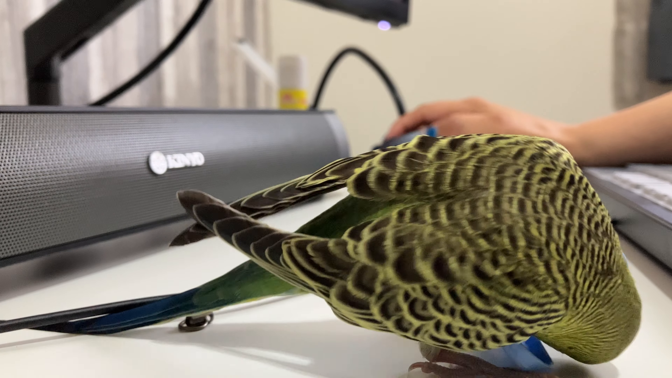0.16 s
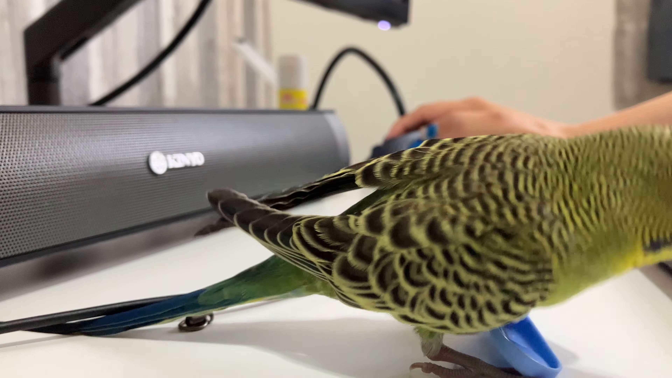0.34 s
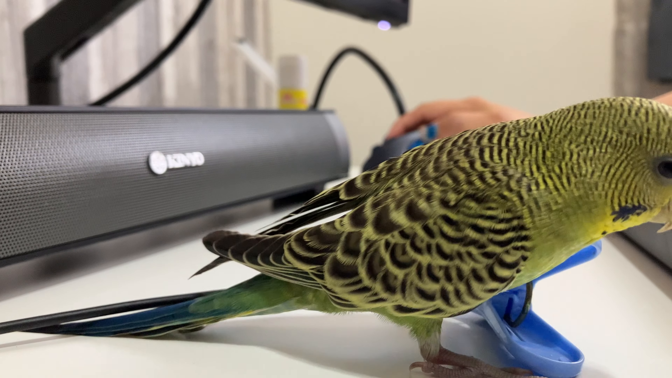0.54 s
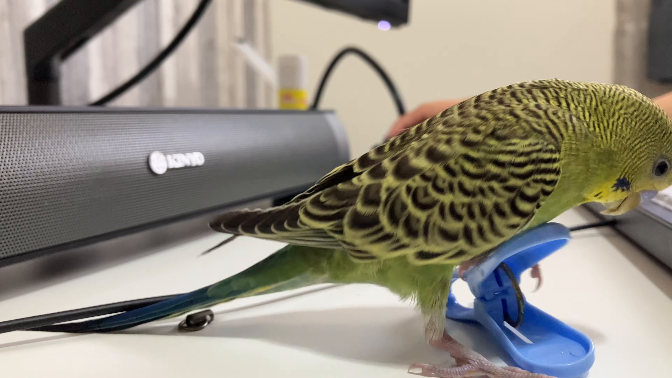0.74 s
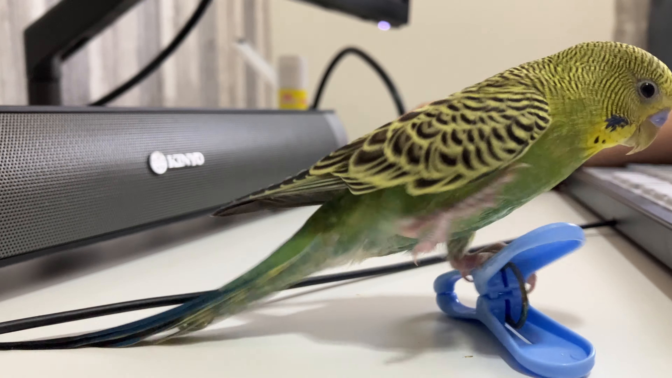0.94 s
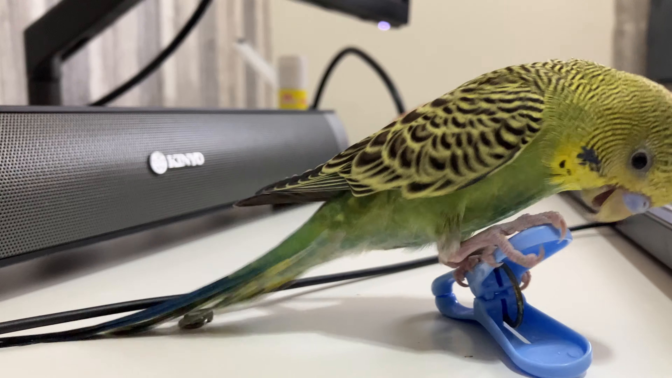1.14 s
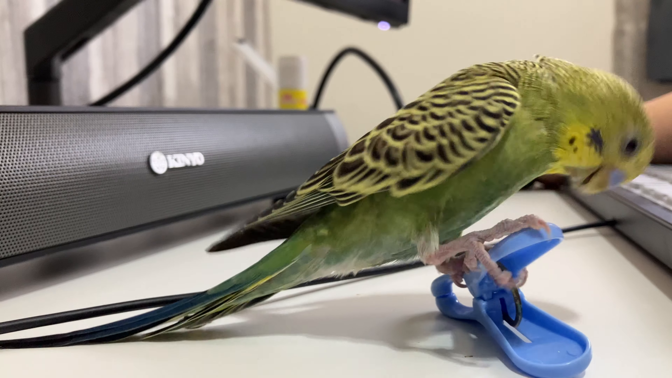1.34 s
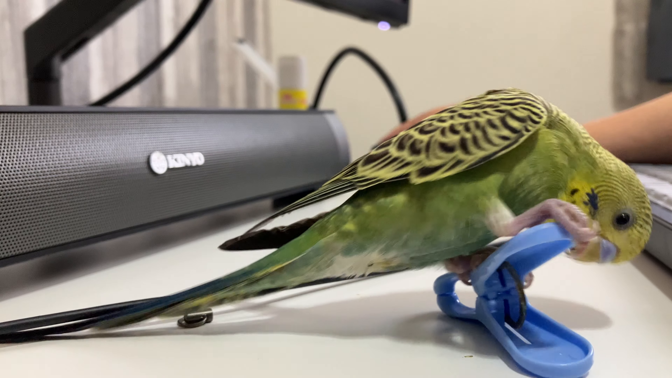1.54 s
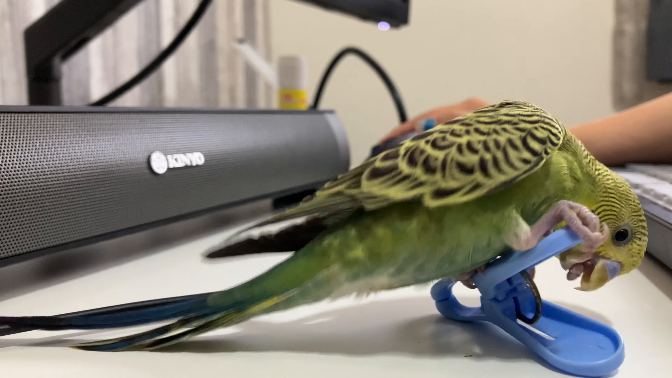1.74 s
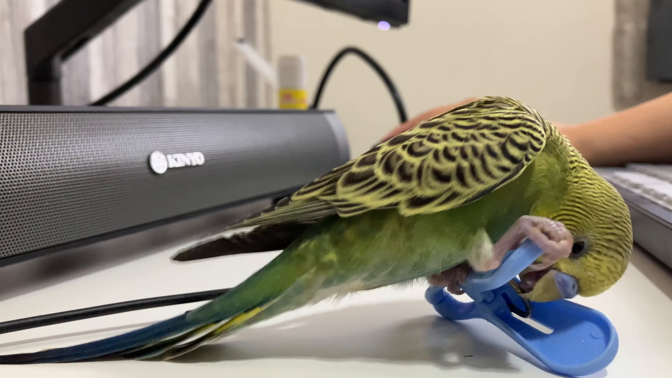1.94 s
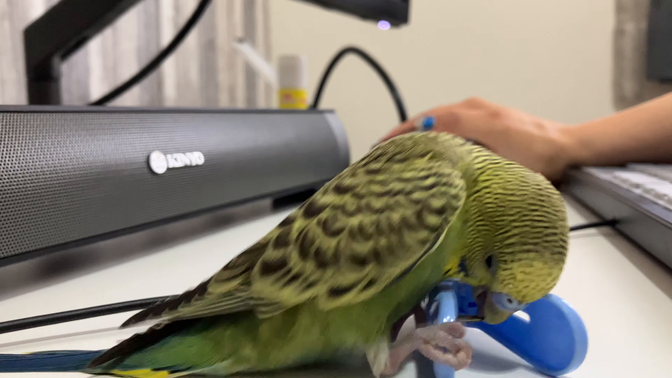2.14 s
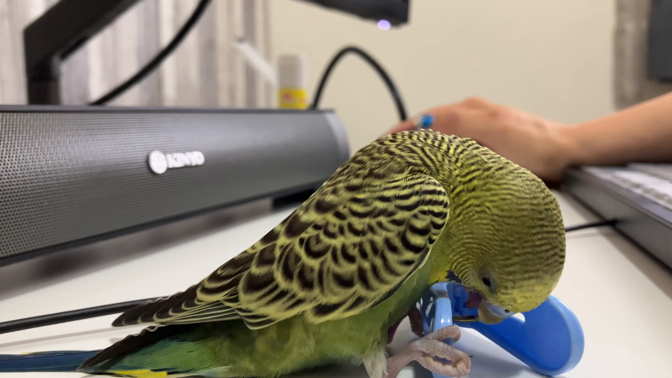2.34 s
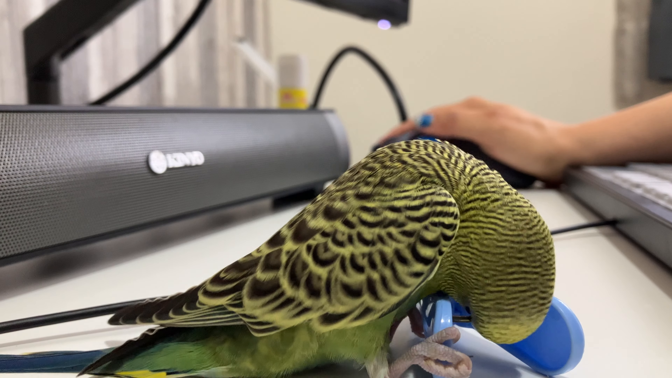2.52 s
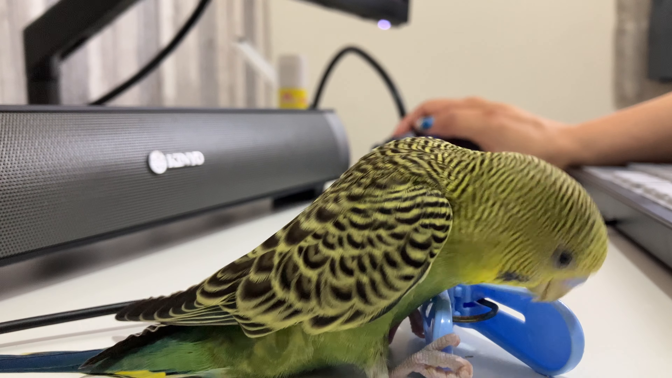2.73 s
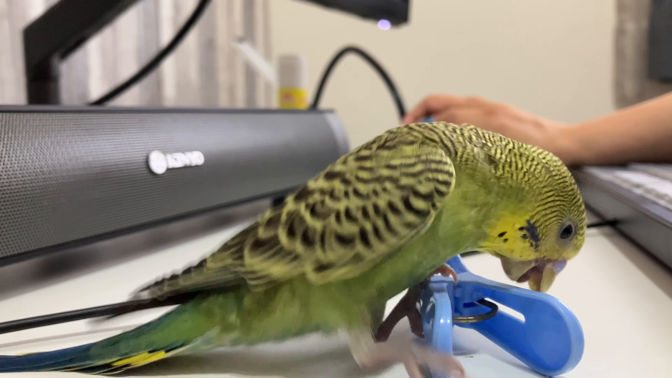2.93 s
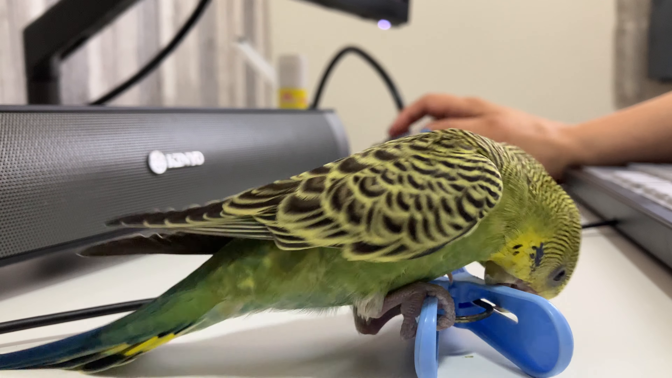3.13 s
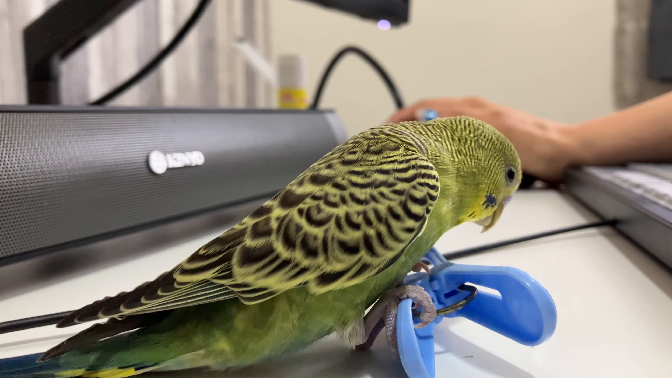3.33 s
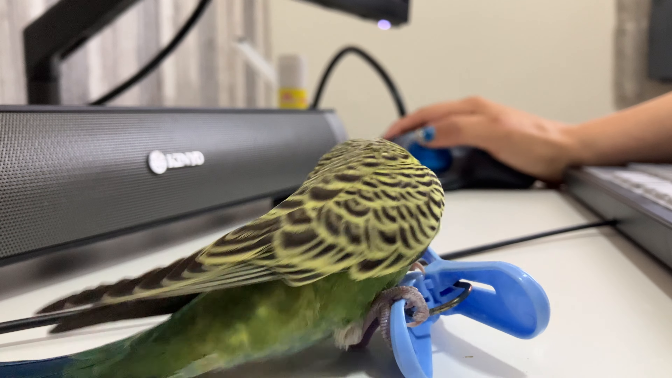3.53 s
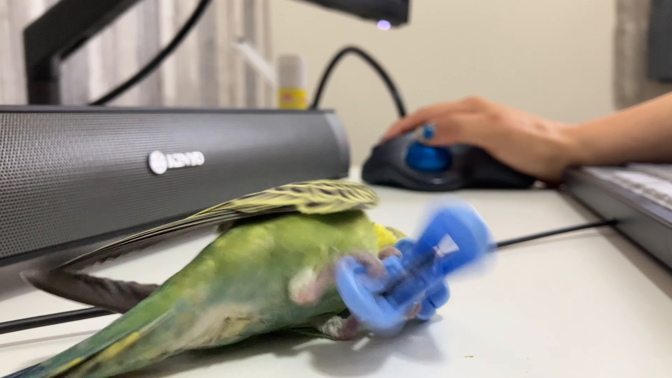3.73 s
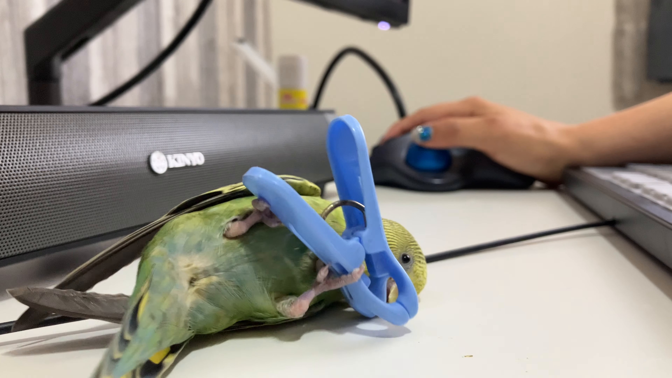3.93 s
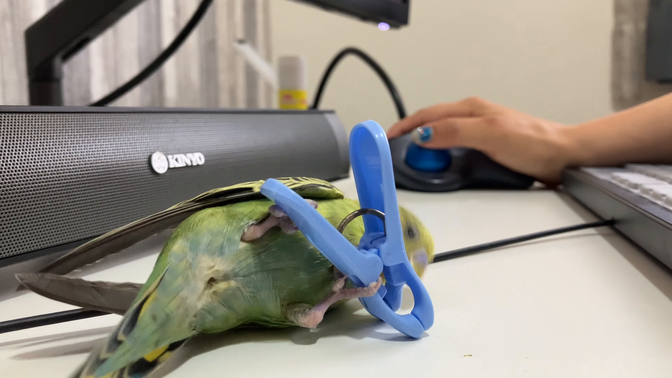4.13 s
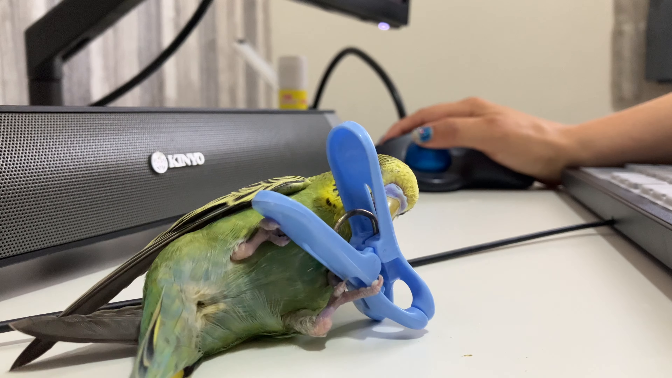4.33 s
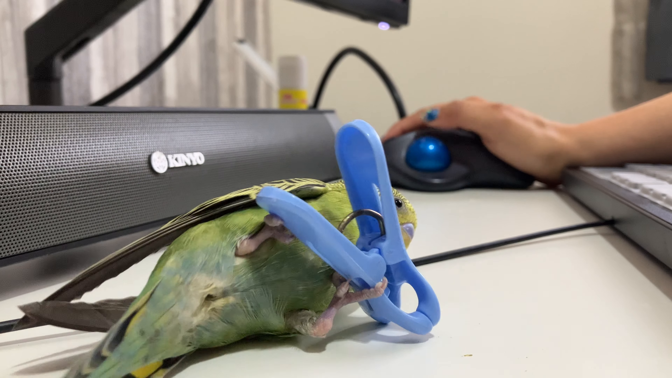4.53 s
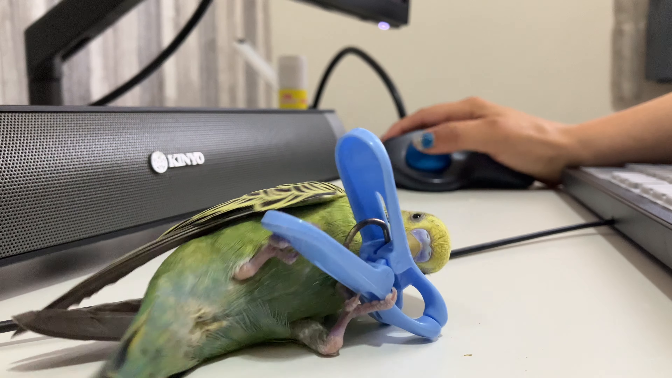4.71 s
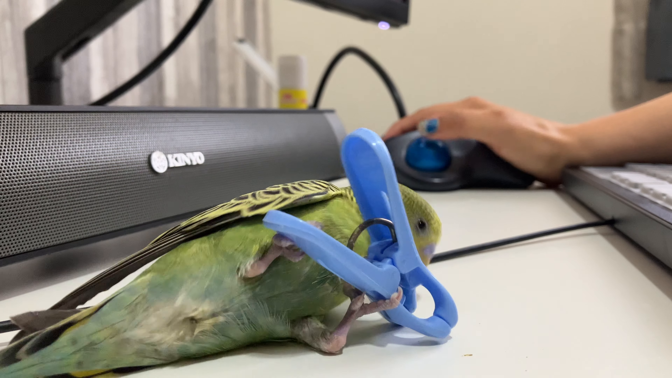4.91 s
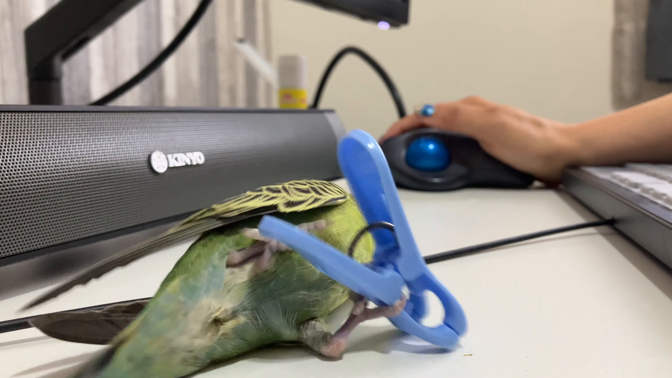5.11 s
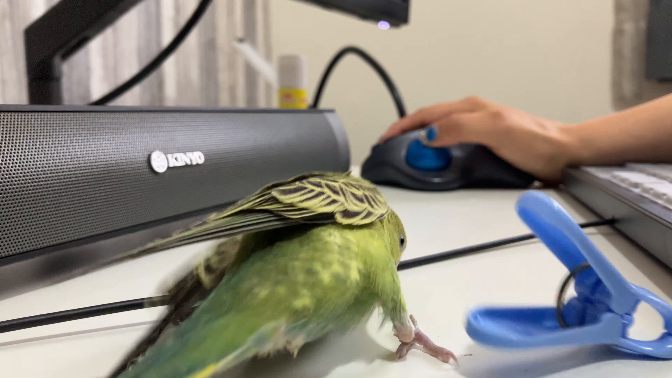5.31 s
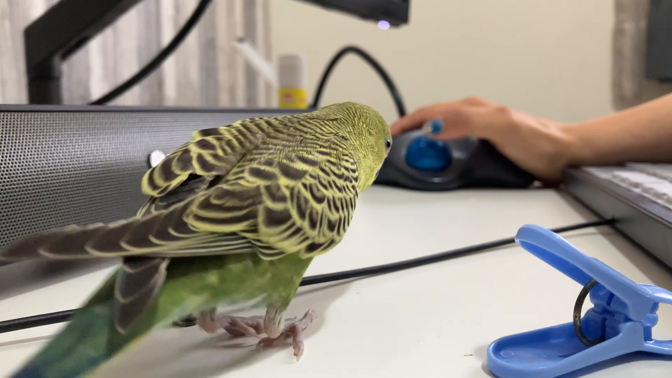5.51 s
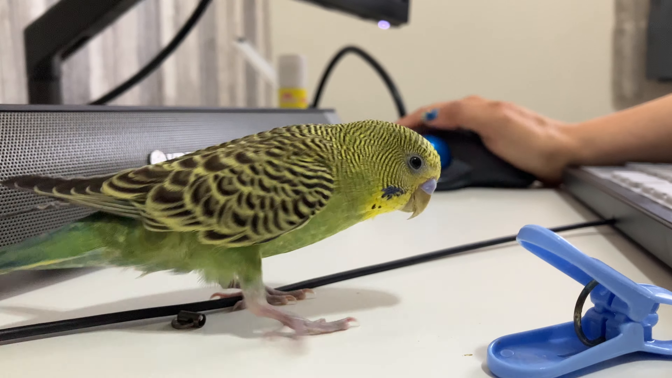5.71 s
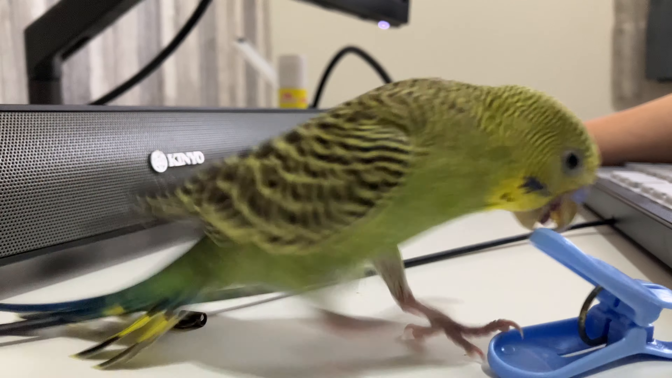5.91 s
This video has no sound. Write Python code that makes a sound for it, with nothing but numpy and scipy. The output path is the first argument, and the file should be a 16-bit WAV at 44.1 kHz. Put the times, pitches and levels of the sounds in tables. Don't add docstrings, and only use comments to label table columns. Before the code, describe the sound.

A parakeet handles a plastic clothespin on a hard desk top, captured close in stereo. Soft dull taps, claw rasps and feather flutters leave gaps of low room air. A single sharp knock stands out early, irregular thumps follow in the middle, then a dense rattling burst near the end as the peg tumbles away. Crisp ticks and light scraping finish it, with a short dry indoor tail.

```python
import sys
import numpy as np
from scipy import signal
from scipy.fft import rfft, irfft, next_fast_len
from scipy.io import wavfile

SR = 44100
rng = np.random.default_rng(int(sys.argv[2]) if len(sys.argv) > 2 else 0)


def generate_wav(sig):
    pcm = np.round(np.clip(np.atleast_2d(sig).T, -1, 1) * 32767).astype(np.int16)
    wavfile.write(sys.argv[1], SR, pcm)


def linear_from_db(decibels):
    return 10 ** (np.asarray(decibels, float) / 20)


N = 267246

# (time [s], peak level [dB], centre pitch [Hz], hardness [dB])
KNOCK_EVENTS = [(0.12, -32.5, 444, -22), (0.2477, -40, 586, -4), (0.351, -35, 660, -16),
                (0.38, -33.5, 403, -19), (0.469, -36, 687, -15), (0.6498, -38.5, 656, -23),
                (0.6844, -39.5, 380, -21), (0.784, -33, 637, -7), (0.8609, -35, 650, -30),
                (0.8906, -29.5, 706, -5), (1.1619, -32.5, 675, -11), (1.336, -40, 645, -13),
                (1.4558, -30.5, 410, -35), (1.4897, -26, 413, -27), (1.5545, -30, 740, -13.5),
                (1.6634, -29, 410, -9), (1.7238, -36.5, 490, -3.5), (1.882, -28, 540, -8.5),
                (1.927, -43, 405, -26), (1.945, -42.5, 487, -9), (2.1605, -24, 776, -4.5),
                (2.18, -13, 663, -12), (2.2044, -39, 610, -14), (2.2225, -49, 575, -27),
                (2.3135, -29.5, 673, -14), (2.4037, -38.5, 734, 0), (2.471, -44.5, 650, -2),
                (2.492, -33.5, 677, -4), (2.5381, -31.5, 670, 0), (2.7434, -40, 680, -7.5),
                (2.886, -37, 632, 4.5), (2.945, -30, 874, 6), (2.9743, -26.5, 494, -2.5),
                (3.1245, -33.5, 870, -7), (3.1452, -33.5, 794, -7), (3.205, -41.5, 720, -4),
                (3.243, -42.5, 670, -23), (3.402, -18, 616, -12.5), (3.4436, -24, 635, -17),
                (3.5228, -41.5, 570, -7), (3.554, -38, 460, -18.5), (3.576, -36.5, 654, -7),
                (3.6615, -40, 564, -13), (3.7062, -18, 434, -14), (3.7314, -34, 360, -31),
                (3.7727, -26, 700, -18), (3.7926, -31, 615, -19.5), (3.8194, -19, 422, -29),
                (3.8597, -32.5, 392, -28), (3.883, -43, 387, -22), (3.9541, -38, 393, -17.5),
                (4.0245, -20.5, 683, -6.5), (4.112, -30.5, 655, -16), (4.1346, -41, 720, -20),
                (4.2201, -30.5, 640, -13), (4.253, -30.5, 536, -12.5), (4.2856, -35, 545, -35),
                (4.476, -36.5, 590, -13), (4.6248, -19.5, 670, -9), (4.6796, -33, 760, -25),
                (4.7003, -16, 683, -10.5), (4.783, -24, 726, -9.5), (4.8689, -23.5, 606, -7.5),
                (5.0374, -36.5, 675, -23), (5.0957, -18, 460, -15), (5.1282, -26.5, 514, -26),
                (5.1565, -18.5, 694, -8), (5.1688, -20, 600, -7), (5.2001, -20.5, 643, 1),
                (5.213, -18, 630, -6), (5.2213, -21.5, 624, -0.5), (5.2303, -27.5, 650, -1),
                (5.2455, -21, 644, -2), (5.2776, -15, 594, 3), (5.2901, -9.5, 664, 0.5),
                (5.3124, -16, 677, -1), (5.3259, -23, 560, 0), (5.3452, -30, 630, -4),
                (5.3558, -16.5, 674, 1), (5.3717, -18.5, 565, 2), (5.414, -39, 460, -18.5),
                (5.4294, -20, 560, -6.5), (5.4398, -21, 466, -15), (5.4591, -21, 535, -10),
                (5.4738, -22.5, 670, -5), (5.627, -29.5, 570, 2), (5.7734, -36, 690, -8),
                (5.8242, -38.5, 630, -16), (5.9065, -24.5, 530, -17), (5.9582, -24, 726, -14),
                (5.972, -24, 620, -5.5), (6.054, -27, 610, -3)]


def rms_one(x):
    return x / np.sqrt(np.mean(x ** 2) + 1e-20)


def in_time(rows):
    times, *columns = np.transpose(rows)
    return [np.interp(np.arange(N) / SR, times, column) for column in columns]


def drift(rate_hz):
    pole = np.exp(-80 * np.pi * rate_hz / SR)
    white = rng.standard_normal(N // 40 + 2002)
    slow = signal.lfilter([1], [1, -2 * pole, pole * pole], white)[2000:]
    return np.interp(np.arange(N) / 40, np.arange(len(slow)), rms_one(slow))


def band(x, low_hz, high_hz, order=2):
    edges_hz = [low_hz, min(high_hz, SR / 2.2)]
    return signal.sosfilt(signal.butter(order, edges_hz, "band", fs=SR, output="sos"), x)


def ring(push, hz, t60_s):
    radius = linear_from_db(-60 / (t60_s * SR))
    angle = 2 * np.pi * hz / SR
    return signal.lfilter([0, np.sin(angle)], [1, -2 * radius * np.cos(angle), radius * radius], push + 1e-18)


def coloured(points, alike):
    top_hz = 15900
    mid, side = rng.standard_normal((2, N))
    alike = np.clip(alike, 0, 1)
    pair = np.sqrt(1 + alike) * mid + np.sqrt(1 - alike) * side * [[1], [-1]]
    hz, level_db = np.transpose(points)
    bin_hz = np.arange(N // 2 + 1) * SR / N
    shape = linear_from_db(np.interp(np.log(bin_hz + 1), np.log(hz), level_db))
    shape[int(top_hz * N / SR):] = 0
    return rms_one(irfft(rfft(pair) * shape, N))


def late(x, lag_s):
    return np.interp(np.arange(N) - lag_s * SR, np.arange(N), x)


def train(times, heights):
    out = np.zeros((2, N))
    out[:, np.minimum((times * SR).astype(int), N - 1)] = heights
    return out


def grains(per_s, spread_db):
    sizes = linear_from_db(spread_db * np.minimum(rng.exponential(1, N), 5)) * rng.choice([-1, 1], N)
    return rms_one(sizes * (rng.random(N) < per_s / SR))


def knocks(drag_db):
    # (frequency [Hz], level [dB])
    desk_modes = [(95, -7.5), (243, -4), (290, -9), (345, -2.5), (395, 0), (453, -4), (525, -3.5),
                  (595, -4.5), (665, -4.5), (730, -0.5), (790, -1), (905, -11), (980, 2.5), (1085, -3.5)]
    # (frequency [Hz], level [dB])
    peg_modes = [(1130, -5), (1220, -7.5), (1380, -3.5), (1555, 3.5), (1610, -2), (1850, -5), (2260, 0),
                 (2900, -6)]
    times, peak_db, pitch_hz, hard_db = np.transpose(KNOCK_EVENTS)
    luck = rng.standard_normal((len(times), 3, len(desk_modes) + len(peg_modes)))
    drag = linear_from_db(drag_db - 36 + 5.34 * drift(32)) * grains(per_s=430, spread_db=1.0)
    desk, dragged, peg = pulses(), 0, 0
    for k, (hz, level_db) in enumerate(desk_modes + peg_modes):
        on_peg = k >= len(desk_modes)
        sign = (-1) ** k
        t60_s = min(65 / hz, .17)
        place_db = 4.73 * luck[:, 0, k] + 2.62 * luck[:, 1:, k].T
        if on_peg:
            blow = train(times, sign * linear_from_db(peak_db + hard_db + level_db + place_db))
            peg = peg + linear_from_db(-10) * ring(blow, hz, t60_s)
            peg = peg + linear_from_db(-3.5) * ring(blow, hz, 10.6 / hz)
        else:
            near_db = -7.0 * np.abs(np.log2(hz / pitch_hz)) ** 2.07
            blow = train(times, sign * linear_from_db(peak_db + level_db + near_db + place_db))
            desk = desk + linear_from_db(-13) * ring(blow, hz, t60_s)
        dragged = dragged + sign * linear_from_db(level_db - 3.3 * on_peg) * ring(drag, hz, 0.8 * t60_s)
    return band(desk, 150, 1700) + band(peg, 1200, 4000) + band(dragged, 65, 3000)


def pulses():
    out = np.zeros(N + 2000)
    t = np.arange(2000) / SR
    for time_s, peak_db, pitch_hz, _ in KNOCK_EVENTS:
        turns = pitch_hz * (0.869 * t + 0.00093 * (1 - np.exp(-t / 0.0022)))
        rise = t * pitch_hz / 1.3
        at = int(time_s * SR) - 40
        out[at:at + len(t)] += linear_from_db(peak_db + 5) * rise * np.exp(-rise) * np.sin(2 * np.pi * turns)
    return out[:N]


def clicks():
    # (time [s], peak level [dB], lower part [dB], length [ms])
    click_events = [(0.058, -54, -37, 1.1), (0.093, -52, -7, 1.4), (0.1377, -39, -12, 1.9),
                    (0.2113, -40, -11, 1.7), (0.2474, -35.5, -14, 1.4), (0.2546, -47, -13, 0.92),
                    (0.2598, -43, -13, 1.8), (0.2744, -52, -11, 2), (0.3797, -38.5, -9, 2.3),
                    (0.461, -41.5, -6, 2.1), (0.6376, -49, -22, 1.5), (0.6707, -36.5, -15, 0.86),
                    (0.688, -40, -20, 2), (0.7747, -38.5, -5.5, 2), (0.789, -28.5, -25, 0.96),
                    (0.8941, -40, -23, 5.4), (1.1584, -27.5, -16.5, 1.54), (1.181, -41, -7.5, 0.99),
                    (1.4501, -38.5, -21, 1.2), (1.4644, -47.5, -13, 1.0), (1.5274, -54.5, -27, 2.4),
                    (1.718, -40.5, -9.5, 2), (1.7431, -35, -9.5, 1.8), (1.8558, -37, -13, 1.0),
                    (1.8795, -33.5, -8, 0.56), (1.9442, -22, -13.5, 1.06), (2.179, -14, 1.5, 1.02),
                    (2.4025, -52, 2.5, 1.5), (2.4712, -41.5, -2.5, 1.6), (2.9439, -23, -4.5, 1.3),
                    (2.9593, -23, -30, 1.05), (2.9643, -25, -13.5, 2.2), (3.0106, -24.5, -22, 0.83),
                    (3.0256, -43, -17, 1.2), (3.1245, -33, -7.5, 0.86), (3.146, -45.5, 0.5, 5.9),
                    (3.206, -38, -3, 1.6), (3.2414, -45, -14, 1.3), (3.4011, -26.5, -5.5, 0.85),
                    (3.4194, -47, -3, 2.0), (3.4463, -38.5, -5, 1.9), (3.5799, -33, -14.5, 1.56),
                    (3.658, -61, -13, 1.4), (3.817, -33.5, -4.5, 1.4), (3.922, -40, -12, 0.48),
                    (3.9262, -37.5, -4.5, 1.4), (3.9402, -45.5, 6, 1), (3.954, -33.5, -12, 2.5),
                    (3.973, -48, -16, 0.79), (3.999, -40.5, -6.5, 1.5), (4.0231, -46.5, 6, 1.2),
                    (4.0379, -45, -3, 1.4), (4.1897, -38.5, -9, 2.5), (4.2498, -34.5, -4, 1.6),
                    (4.2635, -48, -10, 1.4), (4.2833, -41, -8.5, 2.1), (4.627, -41.5, -2, 1.3),
                    (4.7042, -41, 4.5, 0.84), (5.0944, -40.5, -2, 1.7), (5.1573, -20.5, -3.5, 1.1),
                    (5.201, -14.5, -18, 1.2), (5.2781, -22, -3, 2.2), (5.288, -3.5, -12.5, 1.25),
                    (5.3119, -23, 4, 1.7), (5.3565, -35, -1, 4.7), (5.3706, -5, -12, 1.35),
                    (5.4273, -11, -13, 2.2), (5.4555, -18.5, -3, 2), (5.4731, -22, -6, 1.8),
                    (5.569, -36, -13, 4.2), (5.6274, -0.5, -18, 0.72), (5.6436, -22.5, -4, 1.5),
                    (5.6486, -35, -2, 0.76), (5.6684, -1.5, -25.5, 0.62), (5.681, -23.5, -11, 1.1),
                    (5.6897, -13.5, -16.5, 1.24), (5.7118, -18, -20, 1.5), (5.7246, -18.5, -20.5, 1.3),
                    (5.7518, -18.5, -17, 1.2), (5.7657, -17.5, -19, 0.76), (5.7726, -29, -14, 1.2),
                    (5.7755, -32, -21, 2), (5.8232, -43, 11.5, 1.2), (5.8736, -38, -8, 3.5),
                    (5.9057, -24, -20, 1.4), (5.9117, -32, -3, 1.8), (5.937, -26, -12.5, 5.5),
                    (5.9613, -19.5, -9.5, 1.7), (5.971, -15.5, -7.5, 1.1), (5.983, -16, -18, 1.46),
                    (5.998, -25, -13, 1.1)]
    edge_env, crackle_env, lower_env = envelope = np.zeros((3, N))
    offsets = np.arange(-400, 3000)
    t = offsets / SR
    for time_s, peak_db, lower_db, length_ms in click_events:
        width_s = max(length_ms - .6, .15) / 1000
        edge = np.exp(-np.where(t < 0, -t / (.4 * width_s), t / (.7 * width_s)))
        crackle = linear_from_db(-22.5) * np.exp(-t / 0.0086) * (t > 0)
        lower = linear_from_db(lower_db + 3) * np.where(t < 0, edge, np.exp(-t / (width_s + 0.0023)))
        at = int(time_s * SR) + offsets
        inside = at < N
        envelope[:, at[inside]] += linear_from_db(peak_db + 2) * np.array([edge, crackle, lower])[:, inside]
    white = rng.standard_normal((2, N))
    white = np.sign(white) * np.abs(white) ** .5
    return band(white * (edge_env + crackle_env), 5500, 14000) + band(white * lower_env, 1600, 6650)


def rubbing(rasp_db, rustle_db):
    # (frequency [Hz], density [dB per Hz])
    feather_spectrum = [(900, -31), (1800, -13.5), (4000, -9), (7000, -8), (9500, -8), (12000, -11.5),
                        (15500, -13)]
    barbs = 1 + .5 * signal.lfilter([.1], [1, -.96], np.abs(grains(per_s=120, spread_db=3.0)))
    hiss = coloured(feather_spectrum, alike=0.3)
    patches = sum(linear_from_db(1.9 * drift(9)) * band(hiss, hz, 1.35 * hz, order=1)
                  for hz in (4675, 6900, 8840, 11600))
    rustle = linear_from_db(rustle_db + 2.0 * drift(45)) * rms_one(patches)
    white = rng.standard_normal((2, N))
    scrape = sum(linear_from_db(2.7 * drift(18)) * band(white, hz, 1.7 * hz, order=1) for hz in (1700, 2400, 3400))
    rasp = linear_from_db(rasp_db - 5 + 2.0 * drift(35)) * rms_one(band(scrape, 1300, 6000))
    return barbs * (rustle + rasp)


def room(x):
    t60_s, wall_cut_hz = 0.33, 3300
    size = next_fast_len(N + SR)
    hz = np.arange(size // 2 + 1) * SR / size
    spectrum, out = rfft(x.mean(0), size), np.zeros((2, N))
    for k, lag_s in enumerate(rng.uniform(0.01, .035, 16)):
        walls = linear_from_db(-60 * lag_s / t60_s) / (1 + 1j * hz / wall_cut_hz * lag_s / 0.037)
        loop = walls * np.exp(-2j * np.pi * hz * lag_s)
        out[k % 2] += (-1) ** (k // 2) * irfft(spectrum * loop / (1 - loop), size)[:N]
    return out


def thud():
    # (time [s], level [dB])
    swell = [
        (2.25, -70),
        (2.54, -53),
        (2.75, -70),
    ]
    before, after = (swell[0][0] - .05, -95), (swell[-1][0] + 0.063, -95)
    level_db, = in_time([before] + list(swell) + [after])
    return linear_from_db(level_db) * rms_one(ring(rng.standard_normal(N), 72, 1.0))


def room_air():
    # (frequency [Hz], density [dB per Hz])
    air_spectrum = [(20, -34), (40, 0), (74, 4), (160, 3.5), (300, 2.5), (513, -4.5), (718, -1),
                    (1220, -20.5), (2500, -26), (6000, -51.5), (15500, -31)]
    return linear_from_db(-57.5) * coloured(air_spectrum, alike=0.82)


def scene():
    # (time [s], drag on the desk [dB], plastic rasp [dB], feather rustle [dB])
    rub_levels = [(0.0, -46, -68, -71), (0.118, -57, -74, -70.5), (0.202, -38, -51, -62),
                  (0.229, -55, -71, -75), (0.257, -52, -57, -63), (0.323, -57, -82, -76),
                  (0.477, -48, -56, -60.5), (0.607, -65, -79, -90), (0.645, -52, -75, -72.5),
                  (0.778, -50, -64, -63), (0.874, -61, -70, -75), (0.896, -56, -70, -64),
                  (1.048, -57, -86, -81), (1.167, -47, -54, -57), (1.245, -63, -74, -69),
                  (1.419, -57, -78, -71), (1.459, -55, -72, -65), (1.602, -49.5, -78, -77.5),
                  (1.678, -55.5, -65.5, -48.5), (1.702, -35, -62, -63), (1.816, -63, -73, -92),
                  (1.852, -63, -75, -61), (1.934, -52, -71, -75), (1.956, -56, -65, -65),
                  (2.063, -54, -80, -76.5), (2.149, -61, -81, -67), (2.187, -54, -38, -54),
                  (2.353, -59, -66, -79.5), (2.548, -60, -61, -73), (2.65, -65, -81.5, -123.5),
                  (2.75, -58.5, -66.5, -78), (2.865, -63, -77, -89.5), (2.893, -63, -47, -58),
                  (2.931, -58, -64.5, -80), (2.967, -38, -49, -54.5), (3.103, -53, -70, -74),
                  (3.185, -60.5, -61, -66), (3.356, -71, -79, -81.5), (3.38, -65, -79, -75),
                  (3.406, -41.5, -54, -72), (3.452, -40.5, -57, -58), (3.506, -54.5, -70, -76.5),
                  (3.588, -58, -65, -71), (3.628, -85.5, -77, -70.5), (3.72, -34, -64, -57.5),
                  (3.893, -70, -51, -54.5), (4.039, -37, -63, -62), (4.175, -66, -74, -70),
                  (4.2, -51, -62, -59), (4.266, -54.5, -66, -63.5), (4.394, -80, -75, -89),
                  (4.444, -57, -70.5, -75.5), (4.486, -54, -60.5, -54.5), (4.588, -59, -82, -89),
                  (4.641, -52, -52, -57.5), (4.841, -63.5, -73, -66), (4.909, -39, -59, -56),
                  (4.967, -46, -81, -79.5), (5.029, -49, -55, -50), (5.084, -37, -63, -64),
                  (5.112, -30.5, -51, -67), (5.29, -26.5, -42, -40.5), (5.476, -41.5, -56, -54.5),
                  (5.535, -54, -54, -62), (5.567, -52, -64, -59), (5.607, -36, -62, -72),
                  (5.637, -56, -41, -45), (5.773, -46.5, -51, -48.5), (5.811, -60, -66, -61.5),
                  (5.885, -48, -58, -58), (5.97, -47, -37, -43), (6.058, -37, -51, -51)]
    drag_db, rasp_db, rustle_db = in_time(rub_levels)
    low, high = knocks(drag_db), clicks()
    near = low * linear_from_db([[.9], [-.9]]) + high + rubbing(rasp_db, rustle_db)
    near = np.array([near[0], late(near[1], 0.0002)])
    return near + room(linear_from_db(-20) * low + linear_from_db(-18) * high) + room_air() + thud()


def top_cut(x):
    return signal.sosfilt(signal.butter(12, 17310, fs=SR, output="sos"), x)


def record(dry):
    split_hz, port_lag_s = 5645, 0.0002206
    top = signal.sosfiltfilt(signal.butter(6, split_hz, "high", fs=SR, output="sos"), dry)
    shift = np.exp(-2j * np.pi * np.arange(N // 2 + 1) * SR / N * port_lag_s)
    left, right_low = irfft(rfft([dry[0], dry[1] - top[1]]) * shift, N)
    right = right_low - top[0] + linear_from_db(-9) * top[1]
    low_pass = signal.cheby2(10, 70, 17200, fs=SR, output="sos")
    mix = signal.sosfilt(low_pass, np.array([left, right]))
    return top_cut(mix)


dry = scene()
out = record(dry)
generate_wav(out)
```